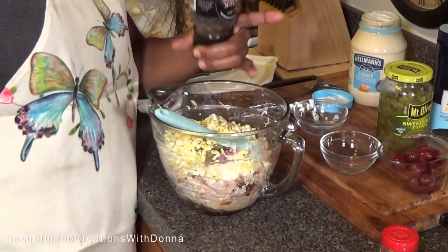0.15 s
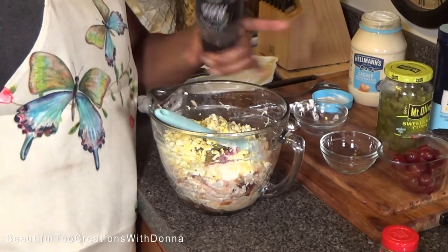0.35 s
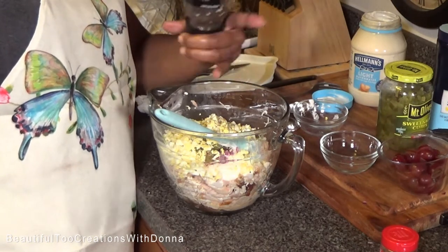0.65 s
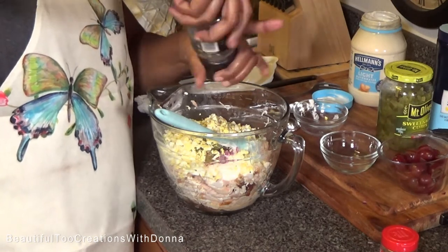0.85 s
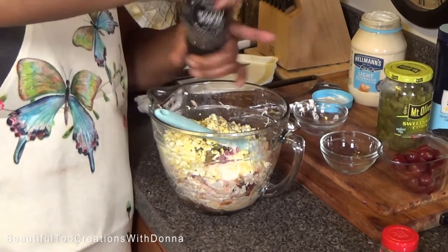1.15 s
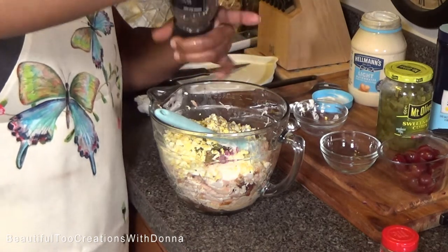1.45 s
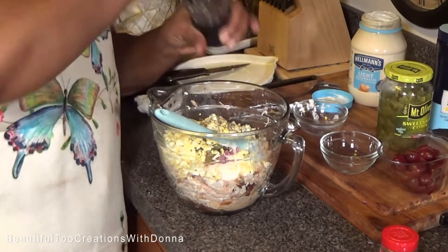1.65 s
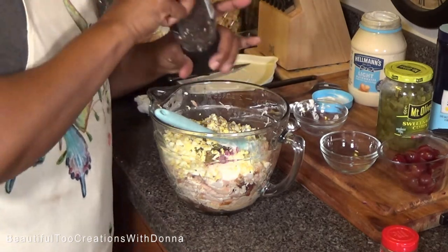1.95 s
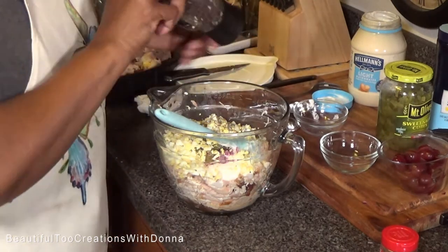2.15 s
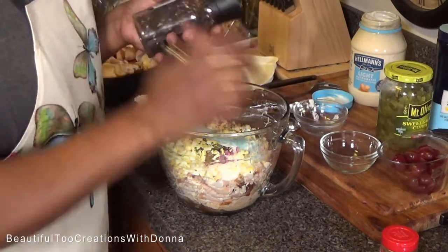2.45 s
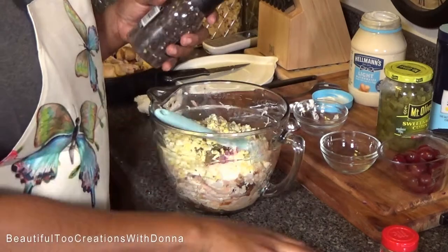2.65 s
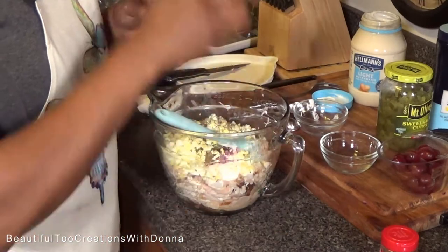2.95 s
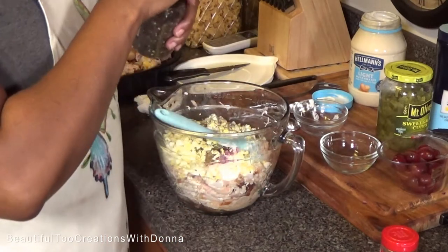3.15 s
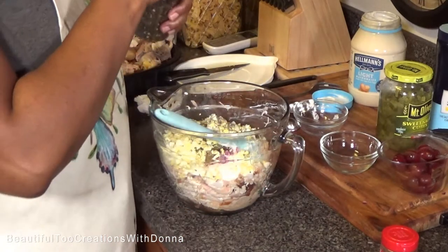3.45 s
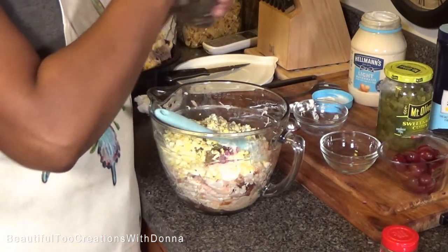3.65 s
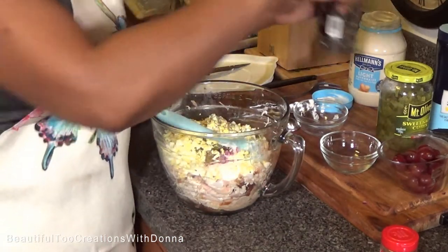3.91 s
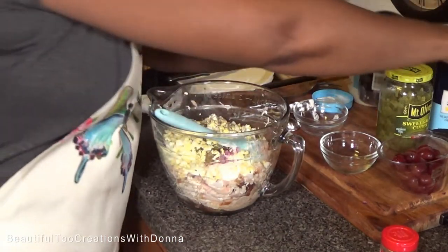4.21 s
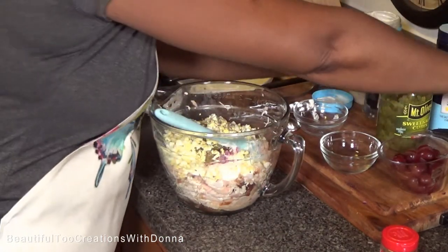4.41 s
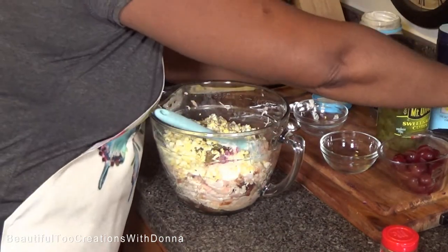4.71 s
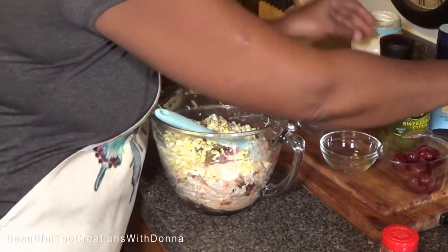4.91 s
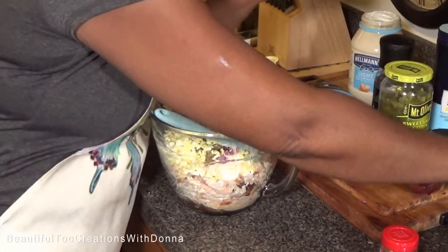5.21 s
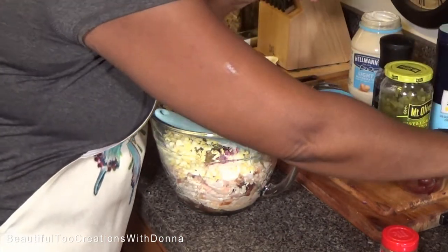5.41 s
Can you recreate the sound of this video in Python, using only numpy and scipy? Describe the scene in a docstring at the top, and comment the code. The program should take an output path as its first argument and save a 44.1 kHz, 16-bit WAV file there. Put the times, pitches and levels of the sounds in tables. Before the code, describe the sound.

Coarse peppercorn crunches come in quick twists, followed by light rattling ticks, sharp knocks of the mill and a bright clatter of small glass.

```python
"""Pepper mill over a glass bowl

Small hard kitchen, stereo camera close to the mill, which a hand twists: filtered noise for grit and cracks.
Bursting corns, ticks of loose corns, knocks of cap and base and chattering glass dishes on the counter are
touches of decaying noise through resonances; the cap rubs once, a short sine.
Behind it all a fridge hums in wavering sines over the noise of room air and microphone hiss."""
import sys
import numpy as np
from scipy import signal
from scipy.fft import rfft, irfft
from scipy.io import wavfile
from scipy.ndimage import uniform_filter1d

SR = 44100
rng = np.random.default_rng(int(sys.argv[2]) if len(sys.argv) > 2 else 0)


def wav_record(signal):
    """Record a signal, one row per channel, as 16-bit PCM in the file named by sys.argv[1]."""
    frames = np.transpose(np.atleast_2d(signal))
    bounded = np.clip(frames, -1, 1)
    # unit amplitude maps onto the largest positive 16-bit level
    quanta = np.round(bounded * 32767).astype(np.int16)
    wavfile.write(sys.argv[1], SR, quanta)


N = 245637

# room air and hiss at the microphone, relative spectrum: [f/Hz, level/dB per Hz]
AIR_SPECTRUM = [(15, -65), (25, -27), (92, -26.5), (161, -11.5), (309, -5), (373, -2), (416, -3.5),
                (516, 0), (641, -7), (714, -4.5), (1610, -12), (6380, -24.5), (11000, -31.5), (14800, -29),
                (16000, -23)]
AIR_RMS_DB = -43.5
# fridge tones: [mean f/Hz, mean peak level/dB]
FRIDGE_TONES = [(168, -55.5), (240, -58.5), (252, -57), (365, -54.5), (377, -51.5)]
# pushes of the wrist (two a twist), shakes and rubs of the mill: [full effort reached t/s, level/dB,
# rise of the last 10 dB t/s, hold t/s, fall of the first 10 dB t/s, coarseness level/dB]; slopes last 1 ms or more
PUSHES = [(0.003, -18, -0.2, 0.01, 0.14, -6), (0.089, -20.5, 0.2, 0.047, 0.08, 4.5),
          (0.379, -15.5, .014, 0.042, 0.07, -0.5), (.49, -15, .06, 0.038, .07, 3),
          (0.772, -11.5, 0.04, 0.023, .025, -1.5), (0.903, -13, 0.0551, 0.021, 0.07, 5.5),
          (1.182, -19.5, 0, 0.034, 0.03, 4), (1.208, -15.5, .012, .02, 0.0365, -1),
          (1.294, -14, 0.0437, 0.04, 0.0551, 2), (1.559, -13, .021, 0.028, 0.02, 0),
          (1.607, -15.5, .021, 0.043, .025, 5), (1.693, -14.5, 0.08, 0.056, 0.01, -0.6),
          (1.902, -12.5, 0.04, 0.0059, .065, 0.5), (1.984, -8.5, 0.0153, 0.0026, 0.0051, -4),
          (2.097, -17, .032, .006, .04, 0.1), (2.165, -19.5, 0.02, 0.011, -0.0176, -1),
          (2.367, -26.5, .003, 0.14, 0.0839, 3), (2.484, -10.5, 0.0053, 0.016, 0.0212, -2),
          (2.744, -28, -0.13, 0.16, .011, -1.5), (2.92, -36.5, 0.34, .08, .03, 0.1),
          (3.057, -41, 0.1, .07, .015, -1.1), (3.17, -34, 0.05, .002, .011, -1),
          (3.822, -45, 0.1, .005, 0.12, -2.1), (3.933, -41.5, 0, .003, 0.06, -9),
          (4.03, -48, .05, 0.0026, 0.05, -11), (4.61, -48.5, 0.6, 0.047, -0.32, 1),
          (4.971, -44.5, 0.06, 0.0083, -0.01, 2), (5.005, -49, .005, .015, -0.2, 1)]
RISE_BEND, FALL_BEND = 1.44, 1.28  # 1 = straight slopes in dB, more = rounder tops and steeper skirts
SETTLE_DB, SETTLE_T60_S = -20.5, 0.87  # corns go on settling in the burr after a push
# burr and microphone together, relative spectrum: [f/Hz, level/dB per Hz]
GRIT_SPECTRUM = [(25, -3.5), (120, -2), (400, -3), (850, -2), (1300, -1), (2200, -1), (4000, 2.5),
                 (6400, 5), (8500, 0), (11000, -9.5), (14800, -4), (16000, 3)]
# air and wall of the mill's jar: [f/Hz, width/Hz, level/dB]
JAR_MODES = [(1074, 43, 1), (1174, 35, 0.5), (1816, 160, -15.5), (2070, 150, -13)]
# whole corns that burst: [t/s, peak level/dB, f/Hz]
BURSTS = [(0.0649, -3.5, 3040), (0.1056, -1.5, 3530), (0.259, -22, 3040), (0.3637, -17, 6330),
          (0.4183, -3, 4400), (0.6663, -16, 1920), (0.73, -23, 7100), (0.749, -10, 6370),
          (0.836, -12, 4660), (1.1804, -17.5, 4470), (1.207, 0, 6270), (1.27, 1, 3280), (1.295, -2, 5800),
          (1.5215, -27, 3330), (1.5413, -4.5, 6400), (1.6034, 0.5, 2540), (1.655, 2.5, 3480),
          (1.684, -5, 6500), (1.8587, -24, 6390), (2.062, -14, 6450), (2.157, -9.5, 5150),
          (2.1773, -8, 4520)]
# loose corns and fingers on the plastic: [t/s, peak level/dB, f/Hz]
TICKS = [(2.304, -22.5, 6200), (2.358, -20, 6900), (2.6974, -23, 6900), (2.727, -21, 5750),
         (2.7423, -16, 7400), (2.8518, -11.5, 7200), (2.8792, -21, 5030), (2.9075, -18, 3690),
         (2.979, -18.5, 5020), (3.0, -23, 5500), (3.04, -19.5, 6850), (3.0812, -21, 5000),
         (3.1157, -25, 5810), (3.1674, -18.5, 5700), (3.197, -21.5, 3590), (3.504, -21, 3000),
         (3.8098, -27.5, 5760), (3.8453, -28, 4630), (3.939, -29, 3150), (3.9537, -33, 4120),
         (4.0437, -31, 5530), (4.15, -27.5, 6060), (4.2597, -34, 4160), (4.3057, -33, 6050),
         (4.355, -22.5, 4600), (4.5139, -40, 3490)]
# a hard blow through the microphone, relative spectrum: [f/Hz, level/dB per Hz]
BLOW_SPECTRUM = [(30, -11), (200, -9), (800, -6.5), (2100, -4), (4000, -7.5), (5800, -7.5), (8500, -8.5),
                 (11300, -16), (16000, -11)]
# one rub of the cap: [t/s, f/Hz, peak level/dB, half length/s]
CAP_RUB = (2.811, 1690, -26, .005)
# cap and base of the mill: [t/s, peak level/dB, thump level re peak/dB, jar ring level/dB, cap f/Hz,
# contact T60/s, echo level/dB]
KNOCKS = [(3.2243, -2.5, -30, -6, 2850, 0.031, -12.5), (3.2414, -2.5, -35, 4, 4500, 0.091, -14.5),
          (3.5087, -1, -34, 13.5, 4640, 0.047, -10), (4.589, -27, 1.1, 19, 2340, 0.045, -14)]
# glass dishes that touch and chatter: [t/s, peak level/dB, favoured f/Hz, contact T60/s, echo level/dB]
CLINKS = [(4.778, -33.5, 5260, 0.087, -16.5), (4.828, -12, 2850, 0.045, -20.5),
          (4.856, -42, 3000, 0.038, -14), (5.3311, -2, 2900, 0.0327, -12), (5.333, 0.5, 7100, 0.029, -18.5),
          (5.351, -8, 2400, 0.074, -8), (5.367, -8.5, 6000, 0.065, -13), (5.382, -5, 1750, 0.017, -8),
          (5.385, 1, 5450, 0.025, -13.5), (5.391, -2, 2210, 0.055, -10.5), (5.409, -5.5, 1810, 0.036, -6),
          (5.43, -8, 2020, 0.028, -12), (5.549, -19, 900, 0.035, -11.5), (5.554, -12, 3200, 0.11, -5)]
# resonances of the glass: [f/Hz, width/Hz, level/dB]
GLASS_MODES = [(1020, 167, -6), (1633, 106, 15.5), (2010, 18, 17), (2620, 80, 11), (2947, 99, 16),
               (3220, 37, 14.5), (4400, 170, 19.5), (5220, 130, 13), (5750, 140, 22), (6007, 52, 14),
               (7770, 150, 21)]
ROOM_T60_S, ROOM_DB = 0.4, -6  # decay of the kitchen and its energy against the direct grinding
MILL_PAN_DB, DISH_PAN_DB = -1.2, -2  # left over right
TOP_HZ = 15850  # upper limit of the camera


def undb(db):
    """Amplitude factor for a level in dB."""
    return 10 ** (np.asarray(db) / 20)


def level(x, db):
    """Scale to an RMS level in dB."""
    return x * undb(db) / np.sqrt(np.mean(x ** 2))


def pan_gains(pan_db):
    """Gains of the two channels, pan_db apart."""
    return undb(np.array([[pan_db], [-pan_db]]) / 2)


def colour(x, spectrum):
    """Causal filter with the given (Hz, dB) shape, its top at 0 dB, from the cepstrum of the log gain."""
    hz, db = np.transpose(spectrum)
    bins_hz = np.arange(4097) * SR / 8192
    gain_db = np.interp(np.log(bins_hz + 1), np.log(hz), db - max(db))
    cepstrum = irfft(gain_db * np.log(10) / 20)
    # folding the cepstrum onto positive time gives minimum phase
    cepstrum[1:4096] *= 2
    cepstrum[4097:] = 0
    impulse = irfft(np.exp(rfft(cepstrum)))
    impulse = np.reshape(impulse, (1,) * (x.ndim - 1) + (-1,))
    return signal.fftconvolve(x, impulse, axes=-1)[..., :x.shape[-1]]


def band(x, hz, width_hz):
    """Two-pole resonance, gain 1 at the centre."""
    b, a = signal.iirpeak(min(hz, 0.4 * SR), hz / width_hz, fs=SR)
    return signal.lfilter(b, a, x)


def ring(x, modes):
    """The sound itself plus its resonances (Hz, width Hz, dB)."""
    return x + sum(undb(db) * band(x, hz, width_hz) for hz, width_hz, db in modes)


def walk(rate_hz):
    """Random values, rate_hz new ones a second, joined by straight slopes; spread near 0.8."""
    hold = int(SR / rate_hz)
    steps = np.repeat(rng.standard_normal(N // hold + 1), hold)
    return uniform_filter1d(steps, hold)[:N]


def add(out, s, sound, db, pan_db):
    """Place a sound at s seconds with peak db before panning."""
    start = int(s * SR)
    sound = sound[:, :N - start] / np.abs(sound).max()
    out[:, start:start + sound.shape[1]] += sound * undb(db) * pan_gains(pan_db)


def echoes(size):
    """Dense echoes of tiles and cupboards, partly other ones for each side, rising over the first 5 ms."""
    t = np.arange(size) / SR
    shared, apart = rng.standard_normal((2, size))
    sides = shared + 0.65 * apart * np.array([[1], [-1]])
    return sides * undb(-60 * t / ROOM_T60_S) * np.clip(t / 0.0051, 0, 1)


def contact(t60, echo_db, touch=0.):
    """A hard first touch, if any, then rough contact as noise that dies away, with echoes of the kitchen."""
    tail = echoes(size=16384)
    t = np.arange(tail.shape[1]) / SR
    decay = undb(-60 * t / max(t60, .001))
    rough = rng.standard_normal(len(t)) * decay * np.clip(t / 0.00058, 0, 1)
    rough[0] = touch  # a single sample against noise of spread 1
    return rough + undb(echo_db) * tail


def background():
    """Room air and microphone hiss as stereo noise, with fridge tones wavering in pitch and level."""
    mid, side = rng.standard_normal((2, N))
    sides = mid + 0.43 * side * np.array([[1], [-1]])
    air = level(colour(sides, AIR_SPECTRUM), AIR_RMS_DB)
    out = air * undb(0.9 * walk(6))
    for hz, db in FRIDGE_TONES:
        turns = np.cumsum(hz + 1.36 * walk(12)) / SR + rng.random()
        out += undb(db + 2.0 * walk(4.83)) * np.sin(2 * np.pi * turns)
    return out


def hand():
    """Pushes rise, hold and fall, and add up in power; coarseness is their mean weighted by power."""
    t = np.arange(N) / SR
    power, coarse = 1e-18, 0
    for s, db, rise, hold, fall, coarse_db in PUSHES:
        early = np.maximum((s - t) / max(rise, .001), 0)
        late = np.maximum((t - s - hold) / max(fall, .001), 0)
        push = undb(db - 10 * early ** RISE_BEND - 10 * late ** FALL_BEND) ** 2
        power = power + push
        coarse = coarse + push * coarse_db
    keep = undb(-120 / SR / SETTLE_T60_S)  # per sample, in power: hence twice 60 dB
    settling = undb(SETTLE_DB) ** 2 * signal.lfilter([1 - keep], [1, -keep], power)
    return np.sqrt(power + settling), coarse / power


def burr():
    """Cracks of all sizes come in clusters, dry or in four broad pitches, over a scrape of fine grit."""
    effort, coarse_db = hand()
    grit = level(rng.standard_normal(N) * undb(2.6 * walk(190)), -0.21)
    for hz in (0, 2200, 3300, 4800, 6800):  # 0 = cracks without a pitch
        bite = undb(6.0 * walk(70))
        size_db = np.minimum(0.87 * rng.exponential(size=N), 9.0)
        struck = rng.random(N) < 500 / SR  # 500 cracks a second on average
        cracks = struck * rng.standard_normal(N) * undb(size_db) * bite
        if hz:
            grit = grit + level(band(cracks, hz, 0.91 * hz), -9.0)
        else:
            grit = grit + level(cracks, -12.5)
    # big pieces crunch lower than dust
    grit = grit + (undb(coarse_db) - 1) * band(grit, 1380, 2130)
    direct = colour(ring(effort * grit, JAR_MODES), GRIT_SPECTRUM)
    room = echoes(size=SR // 2)
    room = room * undb(ROOM_DB) / np.sqrt(np.sum(room ** 2) / 2)
    wet = signal.fftconvolve(direct[None], room, axes=1)[:, :N]
    effort_rms = np.sqrt(np.mean(effort ** 2))
    return level(direct + wet, 0) * effort_rms * pan_gains(MILL_PAN_DB)


def bursts():
    """A whole corn gives way: short rough noise with one broad resonance, in the colour of the burr."""
    out = np.zeros((2, N))
    for s, db, hz in BURSTS:
        crack = ring(contact(0.02, -17.0), [(hz, 0.41 * hz, 6)])
        add(out, s, colour(crack, GRIT_SPECTRUM), db, MILL_PAN_DB)
    return out


def ticks():
    """Loose corns and fingers touch the plastic: a hard touch with one broad resonance."""
    out = np.zeros((2, N))
    for s, db, hz in TICKS:
        tick = ring(contact(0.029, -14.5, touch=3.7), [(hz, 0.48 * hz, 3)])
        add(out, s, colour(tick, BLOW_SPECTRUM), db, MILL_PAN_DB)
    return out


def cap_rub():
    """The cap rubs once: a steady sine that swells and fades as a bell curve."""
    out = np.zeros((2, N))
    s, hz, db, half = CAP_RUB
    t = np.arange(-3 * half, 3 * half, 1 / SR)
    squeak = np.exp(-(t / half) ** 2) * np.sin(2 * np.pi * hz * t)
    add(out, s - 3 * half, squeak[None], db, MILL_PAN_DB)
    return out


def knocks():
    """Cap and base strike hard: the blow rings jar and cap, and a low resonance gives the thump."""
    out = np.zeros((2, N))
    for s, db, thump_db, jar_db, cap_hz, t60, echo_db in KNOCKS:
        blow = contact(t60, echo_db, touch=4.26)
        modes = [(hz, width_hz, gain_db + jar_db) for hz, width_hz, gain_db in JAR_MODES]
        modes.append((cap_hz, 0.58 * cap_hz, 6))
        add(out, s, colour(ring(blow, modes), BLOW_SPECTRUM), db, MILL_PAN_DB)
        add(out, s, band(blow, 290, 340), db + thump_db, MILL_PAN_DB)
    return out


def dishes():
    """Each touch of glass favours the modes near its own pitch: 17.6 dB less drive per octave away."""
    out = np.zeros((2, N))
    for s, db, pitch_hz, t60, echo_db in CLINKS:
        modes = [(hz, width_hz, gain_db - 17.6 * abs(np.log2(hz / pitch_hz)))
                 for hz, width_hz, gain_db in GLASS_MODES]
        clink = ring(contact(t60, echo_db, touch=5.1), modes)
        add(out, s, colour(clink, BLOW_SPECTRUM), db, DISH_PAN_DB)
    return out


def scene():
    """Kitchen air and fridge, the mill close by, and the dishes on the counter."""
    mill = burr() + bursts() + ticks() + cap_rub() + knocks()
    return background() + mill + dishes()


def record(dry):
    """The camera rounds the loudest peaks and cuts the top."""
    rounded = np.tanh(1.17 * dry) / 1.061
    top_cut = signal.ellip(10, 0.2, 60, TOP_HZ, fs=SR, output="sos")
    return signal.sosfilt(top_cut, rounded)


dry = scene()
out = record(dry)
wav_record(out)
```